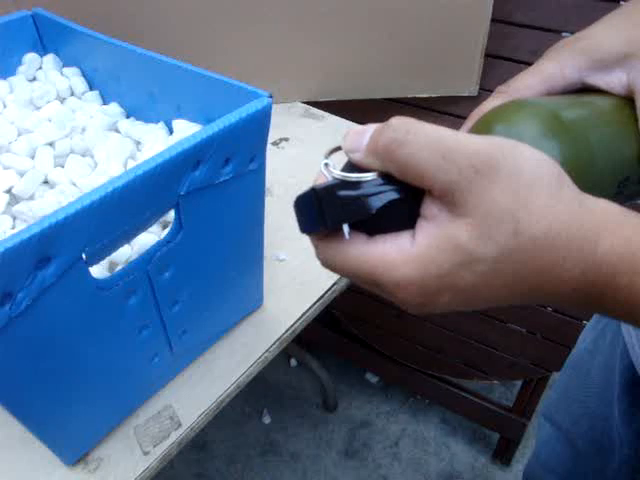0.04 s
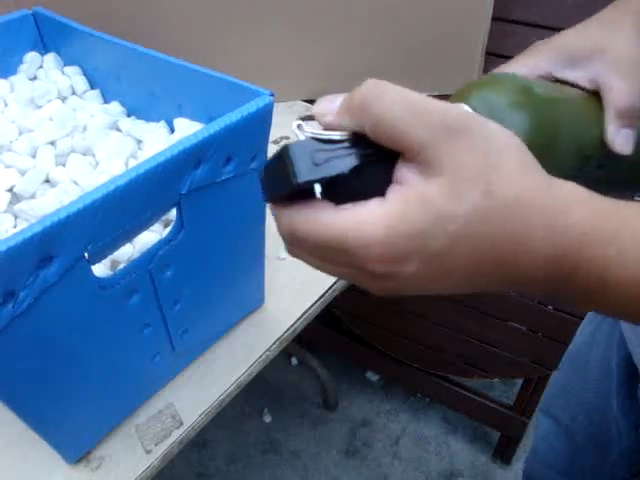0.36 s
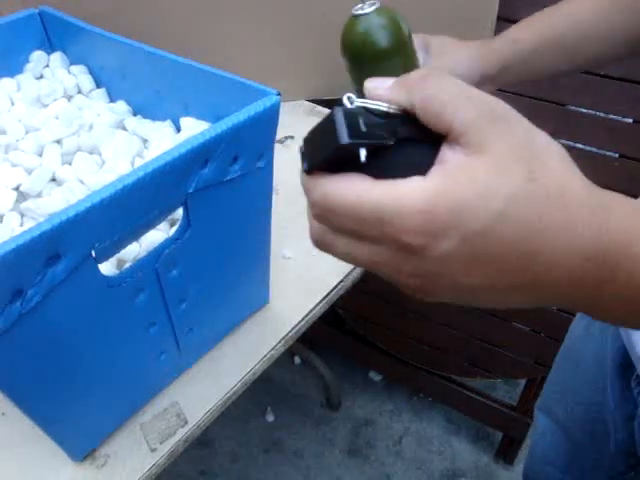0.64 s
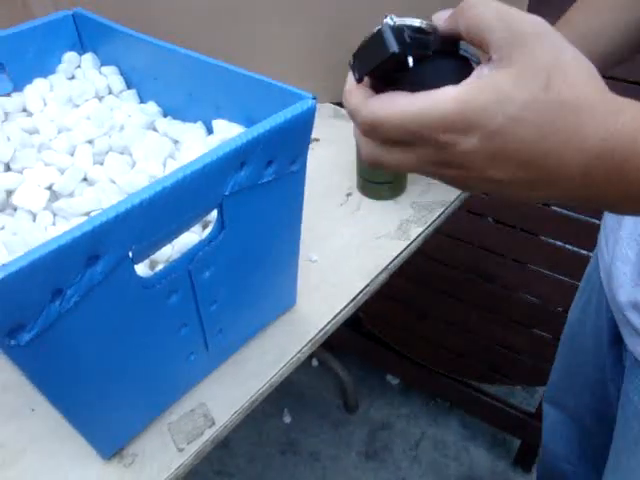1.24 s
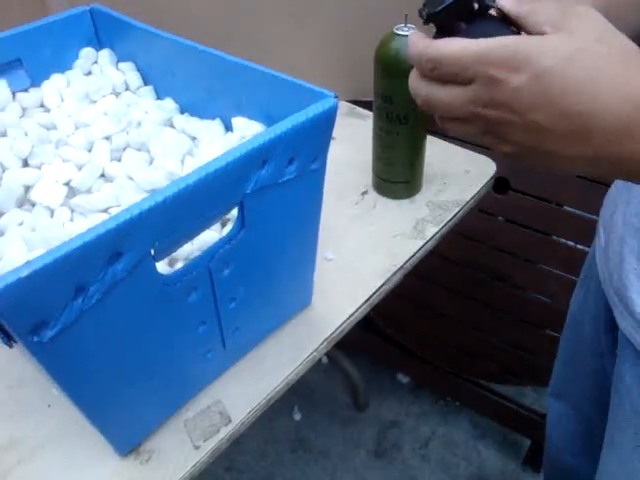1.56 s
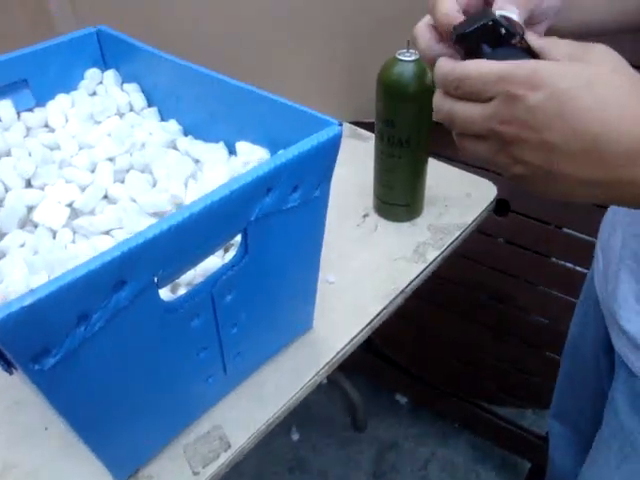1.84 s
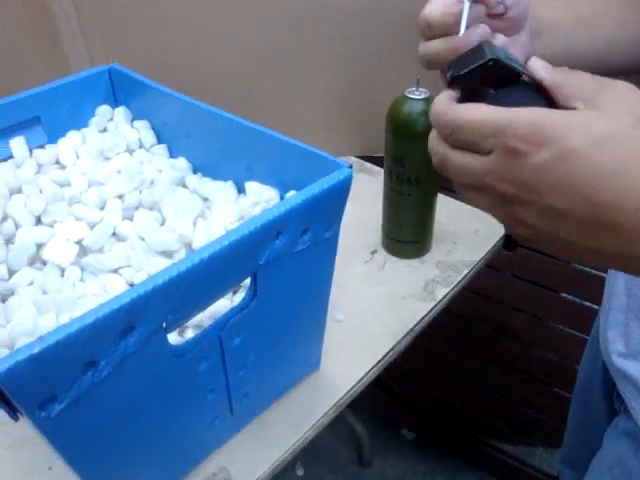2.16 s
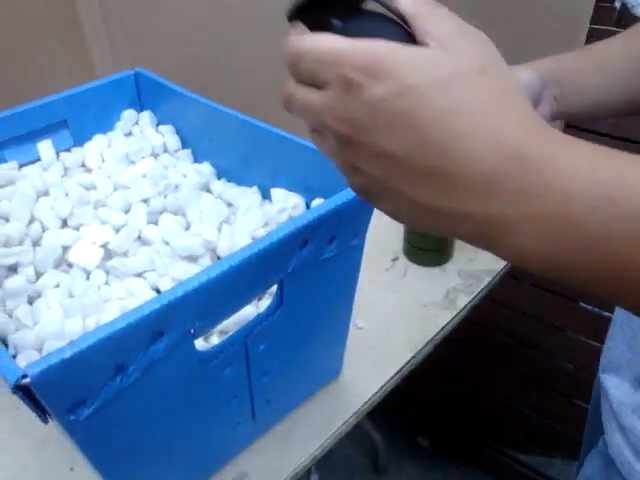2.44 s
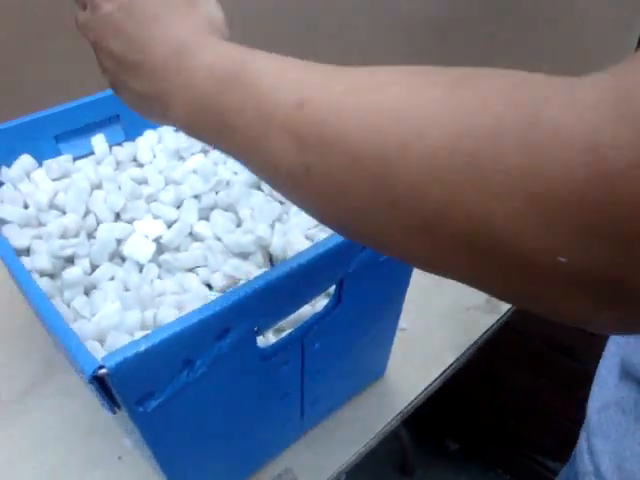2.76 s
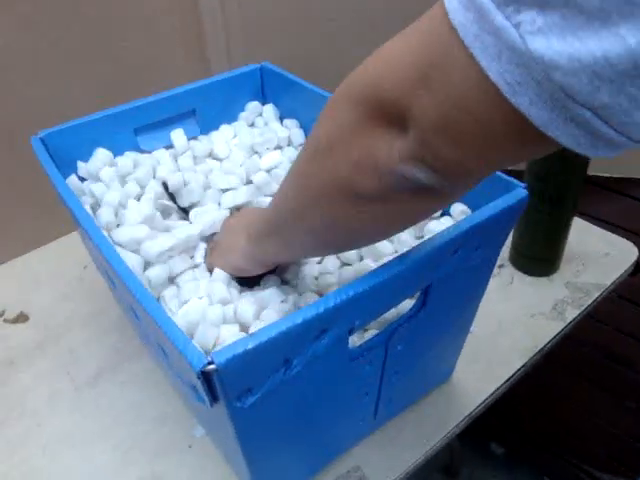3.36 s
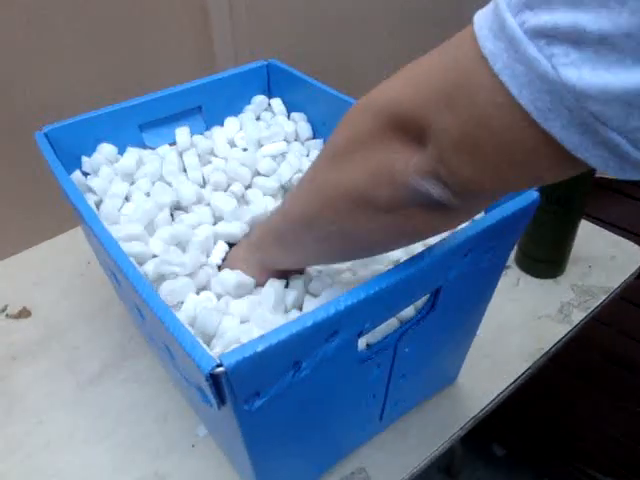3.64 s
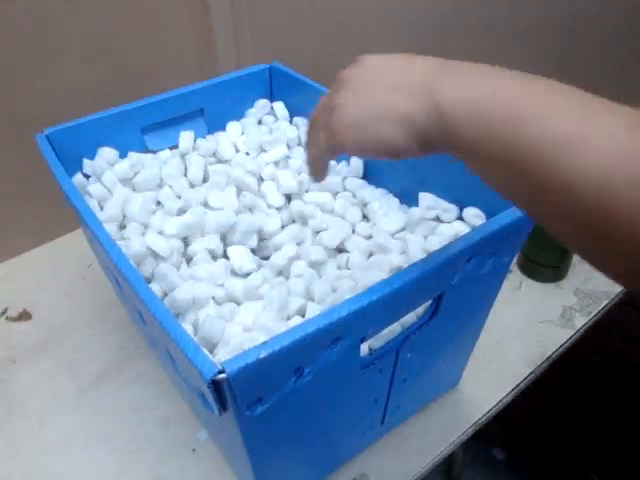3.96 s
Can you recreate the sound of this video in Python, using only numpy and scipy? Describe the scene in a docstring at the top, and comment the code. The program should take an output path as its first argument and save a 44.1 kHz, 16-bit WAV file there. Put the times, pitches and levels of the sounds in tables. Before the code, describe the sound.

A hand rustles through foam pieces, following light metallic clicks and a bottle being set down.

```python
"""A device dug into packing foam

A small plastic device with a metal ring clicks in the hand. A gas bottle is set down on a table,
exciting the modes of both, and rocks once. A hand then plunges the device into a plastic bin of foam
pieces: the walls boom, and countless frictional slips merge into a loud, dense rustle.
All is heard from close by, over quiet room noise and a faint low hum."""
import sys
import numpy as np
from scipy import signal
from scipy.fft import rfft, irfft, next_fast_len
from scipy.io import wavfile
from scipy.ndimage import uniform_filter1d, map_coordinates

SR = 44100
rng = np.random.default_rng(int(sys.argv[2]) if len(sys.argv) > 2 else 0)


def store_pcm(level_fs):
    """Save levels as 16-bit WAV."""
    pcm = np.round(np.clip(level_fs, -1, 1) * 32767).astype(np.int16)
    wavfile.write(sys.argv[1], SR, np.atleast_2d(pcm).T)


N = 176400

# spectra of the room noise and of a soft hiss: frequency_hz, gain_db
ROOM_SPECTRUM = [(15, -43), (25, -32.5), (79, -11), (160, -6), (299, -5.5), (356, -2.5), (425, -8.5),
                 (482, -4), (532, -8.5), (634, -5), (996, -4), (2060, -11.5), (2860, -19), (10000, -26.5),
                 (13000, -73), (22000, -120)]
HISS_SPECTRUM = [(100, -10), (600, 6.5), (1500, -20), (2400, 1), (4000, -4), (6000, -17.5), (10000, -23)]
# envelope of the hiss: time_s, level_db
HISS_ENVELOPE = [(0, -51.5), (.5, -51.5), (1.1, -52), (1.5, -56.5), (2.7, -57), (3.05, -54)]
# course of the hum: time_s, pitch_hz, level_db
HUM_COURSE = [(.05, 133, -63), (.3, 141, -53.5), (.42, 142, -70), (.52, 143, -58), (.6, 145, -69),
              (.73, 147, -53), (.86, 148, -90), (1.55, 158, -63), (3, 157, -66.5)]
# skin and sleeve slide on bottle and device: centre_s, sigma_s, level_db, pitch_hz
SLIDES = [(0.084, .05, -61, 7940), (0.486, 0.1, -54.5, 6000), (0.966, 0.024, -42.5, 2400),
          (1.248, .035, -50.5, 6700), (2.143, 0.027, -64, 4500), (2.92, 0.02, -42, 2720)]
# clicks of the device and duller knocks in the hand: start_s, level_db, pitch_hz, t60_s
DEVICE_CLICKS = [(0.3194, -24.5, 2850, 0.046), (0.3293, -22, 8960, 0.07), (0.3397, -19.5, 8300, 0.045),
                 (0.3644, -22, 6140, 0.014), (0.3669, -19, 5000, 0.027), (0.3716, -20.5, 3560, 0.02),
                 (.384, -33, 4500, 0.083), (1.8757, -20.5, 4900, 0.0055), (1.8851, -24, 2090, 0.013),
                 (1.889, -16.5, 4370, 0.011), (1.894, -21, 4500, .016), (1.9223, -29.5, 4000, 0.04),
                 (1.923, -26, 8100, 0.016), (1.962, -29.5, 2500, 0.033), (1.9646, -27, 3230, 0.027),
                 (1.964, -19.5, 8600, 0.027), (1.967, -21.5, 5470, 0.025), (2.1505, -34, 4400, 0.025),
                 (2.173, -30, 2110, .05), (2.180, -30.5, 4430, 0.028), (2.192, -31, 3430, 0.011),
                 (2.8732, -19, 8300, 0.022), (2.877, -12.5, 6200, 0.01), (2.878, -22.5, 5430, 0.1),
                 (2.877, -27.5, 1955, 0.11), (2.912, -33.5, 6300, 0.08)]
CASE_KNOCKS = [(.3198, -22, 1100, 0.025), (.3405, -16, 1090, 0.022), (.342, -16.5, 2300, 0.059),
               (.345, -10.5, 1660, 0.02), (2.4295, -30, 990, .025), (2.7952, -29.5, 3200, 0.026),
               (2.8222, -30.5, 1800, 0.025), (3.0718, -9.5, 1330, 0.039), (3.0745, -15.5, 2820, 0.037)]
# spectra of those contacts: frequency_hz, gain_db
CLICK_SPECTRUM = [(100, -12), (500, -8.5), (1500, -1.5), (3000, 1), (6000, 2), (10000, -4.5)]
KNOCK_SPECTRUM = [(100, -37), (450, -1), (1500, -2), (2800, -7), (5000, -23), (10000, -23.5)]
# modes of the metal ring: pitch_hz, level_db, t60_s
RING_MODES = [(2520, -40, 0.063), (3400, -28, 0.11), (4300, -26, 0.096), (4670, -26, 0.037),
              (5300, -30, 0.027), (6800, -43.5, 0.5), (7340, -52, 0.28), (8300, -26, 0.033)]
# the bottle meets the table: start_s, level_db, cutoff_hz
BOTTLE_IMPACTS = [(1.0376, -6, 6000), (1.1048, -20, 1700), (1.1105, -43, 1200), (1.138, -32.5, 1500)]
# modes of bottle and table top: pitch_hz, level_db, t60_s
BOTTLE_TABLE_MODES = [(112, -36, 0.19), (188.4, -18.5, 0.19), (249, -19, 0.19), (352, -14.5, 0.14),
                      (510, -8.5, .1), (603, 2, 0.052), (835, -4.5, .05), (1085, 4, 0.012),
                      (1380, -0.5, 0.021), (1660, 0.5, 0.022), (2190, -28, 0.034), (2710, -8.5, 0.02),
                      (4450, -20, 0.036)]
# spectra of the blow and of the table's shudder after it: frequency_hz, gain_db
THUD_SPECTRUM = [(60, -29), (200, -5), (700, 4), (1600, -2), (3500, -11.5), (10000, -19)]
SHUDDER_SPECTRUM = [(30, -22), (80, -11), (180, 3.5), (400, -5), (1500, -13.5), (4000, -22), (10000, -25)]
# envelopes of the stirring and of the treble scraping in the foam: time_s, level_db
STIR_ENVELOPE = [(3.066, -65), (3.074, -31), (3.10, -31.5), (3.142, -37), (3.172, -29.5), (3.194, -33.5),
                 (3.23, -32), (3.26, -32), (3.39, -30), (3.47, -26), (3.54, -19), (3.60, -26),
                 (3.70, -31.5), (3.77, -29.5), (3.815, -34.5), (3.83, -42), (3.905, -39), (3.95, -46),
                 (4, -44.5)]
SCRAPE_ENVELOPE = [(3.066, -59), (3.073, -18), (3.09, -31), (3.12, -26.5), (3.143, -35.5), (3.168, -25.5),
                   (3.194, -32.5), (3.23, -27.5), (3.26, -35), (3.32, -33.5), (3.335, -25), (3.352, -38.5),
                   (3.372, -25), (3.39, -35), (3.52, -27), (3.65, -31), (3.70, -36.5), (3.775, -30),
                   (3.83, -40.5), (3.905, -36), (3.96, -40.5), (4, -37.5)]
# spectra of crunch, scraping and the bin's cavity: frequency_hz, gain_db
CRUNCH_SPECTRUM = [(200, -33), (450, -12), (800, -6.5), (930, 0.5), (1020, 1.5), (1100, -1), (1450, -1),
                   (2050, -2), (2450, 0), (3200, -2.5), (4500, -10), (6500, -30), (10000, -36)]
SCRAPE_SPECTRUM = [(1000, -31), (3000, 6.5), (5000, 5), (7500, 2), (10000, -1)]
CAVITY_SPECTRUM = [(30, -44), (110, -23), (200, -11.5), (290, -4), (340, -8), (382, 5.5), (420, -2.5),
                   (475, 5.5), (550, -2.5), (635, 3), (760, -3.5), (2000, -40)]
# single pieces snap past each other: start_s, level_db, pitch_hz, t60_s
FOAM_SNAPS = [(3.174, -36, 5000, 0.01), (3.411, -17, 1400, 0.049), (3.469, -12, 1800, 0.045),
              (3.538, -28, 1190, .015), (3.6165, -13.5, 1050, 0.044), (3.6195, -16, 2800, .012)]
# foam is shoved against the bin's walls: start_s, level_db, rise_s
WALL_SHOVES = [(3.077, -16, .011), (3.158, -29.5, 0.011), (3.467, -31.5, 0.006), (3.534, -15.5, 0.0032)]
# modes of those walls: pitch_hz, level_db, t60_s
WALL_MODES = [(159, -22.5, 0.13), (238.5, -10, 0.11), (333.3, 6, 0.076), (382, -4, 0.084),
              (469.5, -5, 0.091), (544, -2, 0.072)]
# spectrum of the table under the bin: frequency_hz, gain_db
RUMBLE_SPECTRUM = [(25, -22), (80, -9.5), (170, -0.5), (320, 8.5), (700, -18), (2000, -43)]
# reverberation time of the room: frequency_hz, t60_s
REVERB_TIMES = [(100, 0.36), (500, 0.57), (2000, 1), (10000, 0.47)]


def amp(db):
    """Decibels to amplitude ratio."""
    return 10 ** (np.asarray(db) / 20)


def unit(x):
    """Normalisation to rms 1."""
    return x / np.sqrt(np.mean(x ** 2) + 1e-20)


def along(points, hz):
    """Interpolation on a logarithmic frequency axis."""
    f, values = np.transpose(points)
    return np.interp(np.log(hz + 1), np.log(f + 1), values)


def curves(rows):
    """Linear interpolation of each column after the time, one value a sample."""
    times, *columns = np.transpose(rows)
    return [np.interp(np.arange(N) / SR, times, column) for column in columns]


def wobble(knots_per_s):
    """Random modulation: a spline through Gaussian values."""
    return map_coordinates(rng.standard_normal(4096), [np.arange(N) * knots_per_s / SR], mode="wrap")


def filtered(x, gain_db):
    """Filtering by multiplication of the spectrum; gain_db maps Hz to dB."""
    size = next_fast_len(len(x) + 8192)
    return irfft(rfft(x, size) * amp(gain_db(np.fft.rfftfreq(size, 1 / SR))), size)[:len(x)]


def noise(spectrum, size=N):
    """White noise shaped to a spectrum; rms 1."""
    return unit(filtered(rng.standard_normal(size), lambda f: along(spectrum, f)))


def bell(f, hz, octaves):
    """A Gaussian peak around hz on a logarithmic axis."""
    return np.exp(-.5 * (np.log2((f + 1) / hz) / octaves) ** 2)


def add(track, start_s, sound):
    """Superposition of a sound on the track."""
    part = track[round(start_s * SR):][:len(sound)]
    part += sound[:len(part)]


def free_vibration(modes, t):
    """A sum of damped sinusoidal modes, neighbours in opposite sign."""
    return sum((-1) ** k * amp(db - 60 * t / t60) * np.sin(2 * np.pi * hz * t)
               for k, (hz, db, t60) in enumerate(modes))


def background():
    """Steady room noise, a soft hiss and a hum modulated in amplitude and frequency."""
    (hiss_db,), (hum_hz, hum_db) = curves(HISS_ENVELOPE), curves(HUM_COURSE)
    hum_rms = amp(hum_db + wobble(9))
    phase = 2 * np.pi * np.cumsum(hum_hz + .5 * wobble(12)) / SR
    hum = hum_rms * np.sqrt(2) * np.sin(phase)
    return amp(-49.5) * noise(ROOM_SPECTRUM) + amp(hiss_db) * noise(HISS_SPECTRUM) + hum


def scuffs():
    """Sliding friction of skin and sleeve makes soft swells of broadband noise."""
    out, t = np.zeros(N), np.arange(N) / SR
    for centre_s, sigma_s, db, hz in SLIDES:
        rub = unit(filtered(rng.standard_normal(N), lambda f: 22 * bell(f, hz, octaves=1.015)))
        out += amp(db) * np.exp(-.5 * ((t - centre_s) / sigma_s) ** 2) * rub
    return out * amp(1.5 * wobble(120))


def contacts(rows, spectrum, crest_db, lift_db=10.3, octaves=.25):
    """A brief contact excites dense modes: decaying noise, lifted at the struck part's resonance."""
    out, t = np.zeros(N), np.arange(SR // 8) / SR
    attack = 1 - np.exp(-t / 0.000084)
    for start_s, db, hz, t60 in rows:
        white = rng.standard_normal(len(t))
        burst = unit(filtered(white, lambda f: along(spectrum, f) + lift_db * bell(f, hz, octaves)))
        add(out, start_s, burst * amp(db - crest_db - 60 * t / t60) * attack)
    return out


def device():
    """Impulsive excitation: the catch clicks and sets the metal ring vibrating; the case knocks."""
    metal, t = np.zeros(N), np.arange(SR // 3) / SR
    for start_s, db, hz, _ in DEVICE_CLICKS:
        # modes far from the click's pitch are up to 6 dB weaker
        modes = [(f * (1 + rng.normal(0, .003)), level + 6 * (bell(f, hz, 0.77) - 1), t60)
                 for f, level, t60 in RING_MODES]
        add(metal, start_s, amp(db) * free_vibration(modes, t))
    clicks = contacts(DEVICE_CLICKS, CLICK_SPECTRUM, crest_db=2.5, lift_db=16, octaves=.11)
    knocks = contacts(CASE_KNOCKS, KNOCK_SPECTRUM, crest_db=5)
    return metal + clicks + knocks


def bottle(thud_t60=0.058, shudder_t60=0.3, shudder_rise_s=0.021):
    """Impact excites the modes of bottle and table; the softer, settling blows carry less treble."""
    out, t = np.zeros(N), np.arange(SR // 3) / SR
    highpass = signal.butter(2, 150, "high", fs=SR)
    for start_s, db, cutoff_hz in BOTTLE_IMPACTS:
        body = free_vibration(BOTTLE_TABLE_MODES, t)
        thud = noise(THUD_SPECTRUM, len(t)) * amp(-11 - 60 * t / thud_t60)
        blow = signal.lfilter(*highpass, body / np.abs(body).max() + thud)
        shudder = noise(SHUDDER_SPECTRUM, len(t)) * amp(-23 - 60 * t / shudder_t60)
        shudder *= 1 - np.exp(-t / shudder_rise_s)
        lowpass = signal.butter(1, cutoff_hz, fs=SR)
        add(out, start_s, amp(db) * signal.lfilter(*lowpass, blow + shudder))
    return out


def slips(spectrum, centre_hz, per_s=6000, t60_cycles=6.4):
    """Stick-slip friction: a dense stream of tiny releases, each a damped sinusoid; rms 1."""
    when, size, pitch = rng.random((3, per_s * N // SR))
    hz = np.clip(centre_hz * 2 ** (3 * (pitch - .5)), 200, 11000)[:, None]
    age = np.arange(192)  # samples
    cycles = hz * age / SR
    strength = amp(-0.5 * np.log(np.maximum(size, .01)))[:, None]
    grains = strength * np.sqrt(hz) * np.sin(2 * np.pi * cycles) * amp(-60 * cycles / t60_cycles)
    positions = (when * N).astype(int)[:, None] + age
    stream = rfft(np.bincount(positions.ravel(), grains.ravel(), N)[:N])
    # whiten the stream before giving it its spectrum
    power = np.abs(uniform_filter1d(np.abs(stream) ** 2, 1500))
    white = irfft(stream / np.sqrt(power + 1e-9), N)
    return unit(filtered(white, lambda f: along(spectrum, f)))


def foam():
    """Friction among the pieces crunches, scrapes and snaps; the bin's cavity resonates beneath."""
    (stir_db,), (scrape_db,) = curves(STIR_ENVELOPE), curves(SCRAPE_ENVELOPE)
    clumps_db = 0.78 * wobble(130)
    crunch = slips(CRUNCH_SPECTRUM, centre_hz=2400) * amp(stir_db + clumps_db)
    scrape = slips(SCRAPE_SPECTRUM, centre_hz=6200) * amp(scrape_db + clumps_db + 0.53 * wobble(180))
    cavity_db = stir_db.max() - 10.5 + 0.78 * (stir_db - stir_db.max())  # varies less than the crunch
    cavity = noise(CAVITY_SPECTRUM) * amp(cavity_db + clumps_db)
    touching = np.arange(N) / SR > STIR_ENVELOPE[0][0]
    snaps = contacts(FOAM_SNAPS, CRUNCH_SPECTRUM, crest_db=8)
    return touching * (crunch + scrape + cavity) + crackles(scrape_db) + snaps


def crackles(scrape_db, per_s=45, t60=0.035, candidates=400):
    """Stick-slip events: pieces catch and let go at random, at levels that follow the scraping."""
    rows = []
    for when, size, pitch, chance in rng.random((candidates, 4)):
        start_s = when * N / SR
        if start_s > STIR_ENVELOPE[1][0] and chance < per_s * N / SR / candidates:
            db = scrape_db[int(when * N)] - 0.5 + 6 * size
            rows.append((start_s, db, 2500 * 4 ** pitch, t60))
    return contacts(rows, CLICK_SPECTRUM, crest_db=2.5, lift_db=12)


def bin_walls(rumble_t60=0.21):
    """A cushioned force excites the walls' low modes; slower shoves shake the table more."""
    out, t = np.zeros(N), np.arange(SR // 3) / SR
    slowest_s = max(rise_s for _, _, rise_s in WALL_SHOVES)
    for start_s, db, rise_s in WALL_SHOVES:
        push = 1 - np.exp(-(t / rise_s) ** 2)
        boom = free_vibration(WALL_MODES, t) * push
        rumble = noise(RUMBLE_SPECTRUM, len(t)) * amp(-10.5 - 60 * t / rumble_t60) * push
        add(out, start_s, amp(db) * (boom / np.abs(boom).max() + rumble * rise_s / slowest_s))
    return out


def room(direct):
    """Convolution with the room's response: early reflections within 30 ms and a weak diffuse tail."""
    hz, t, bands = signal.stft(rng.standard_normal(SR // 2), SR, nperseg=256)
    decay = amp(-60 * t / along(REVERB_TIMES, hz)[:, None])
    tail = signal.istft(bands * decay, SR, nperseg=256)[1]
    delay_s = rng.uniform(.002, .028, 24)
    strength = rng.standard_normal(24) * np.exp(-delay_s / 0.0058)
    early = np.bincount((delay_s * SR).astype(int), strength, len(tail))
    response = amp(-22.5) * tail / np.linalg.norm(tail) + amp(-17) * early / np.linalg.norm(early)
    return direct + signal.fftconvolve(direct, response)[:N]


def scene():
    """Superposition of the handling sounds, their reverberation and the background."""
    handling = scuffs() + device() + bottle() + foam() + bin_walls()
    return (background() + room(handling))[None]


def record(dry, start_s=0.041, fade_s=0.0043, cutoff_hz=10040):
    """Gating and band limiting: the sound opens just after the start and passes a steep low-pass."""
    gate = np.clip((np.arange(N) / SR - start_s) / fade_s, 0, 1)
    return filtered(dry[0] * gate, lambda f: -100 * np.clip((f - cutoff_hz) / 300, 0, 1))[None]


dry = scene()
out = record(dry)
store_pcm(out)
```